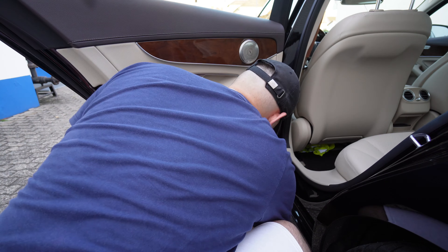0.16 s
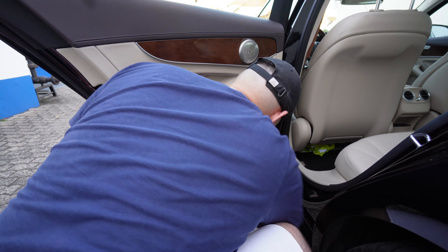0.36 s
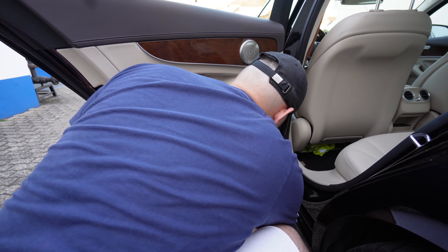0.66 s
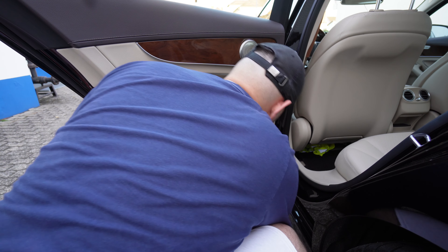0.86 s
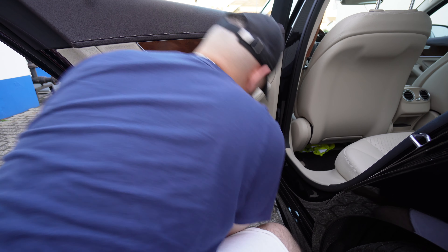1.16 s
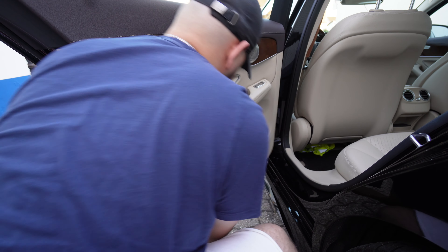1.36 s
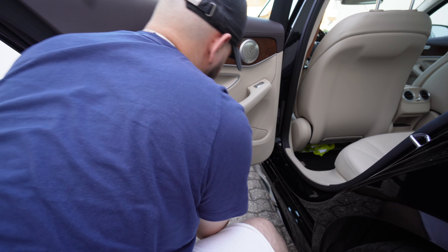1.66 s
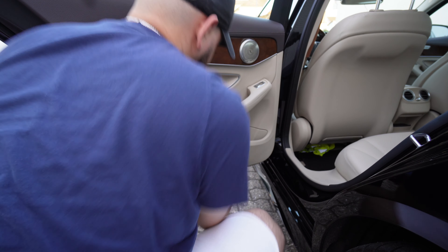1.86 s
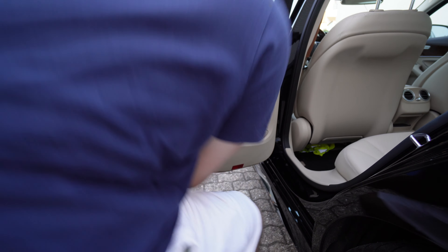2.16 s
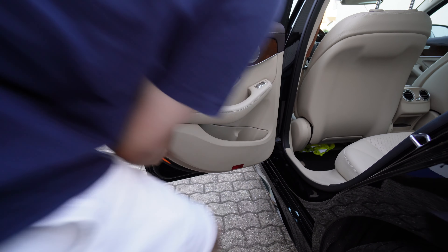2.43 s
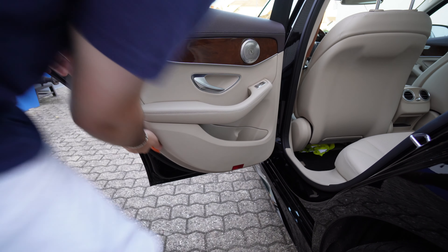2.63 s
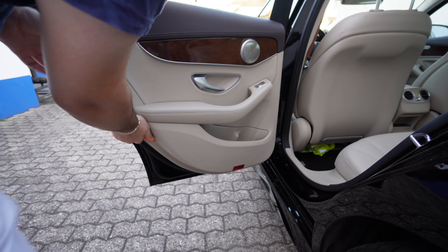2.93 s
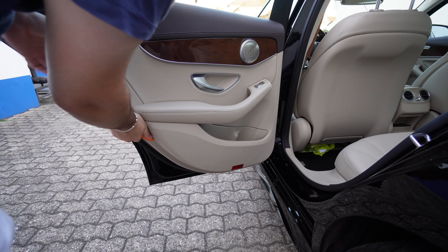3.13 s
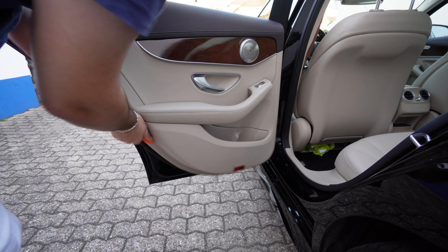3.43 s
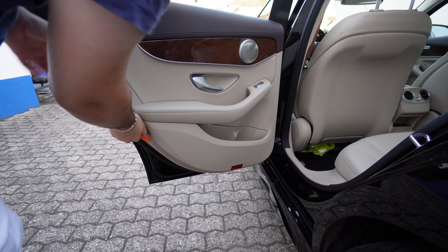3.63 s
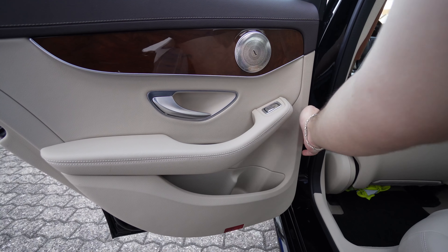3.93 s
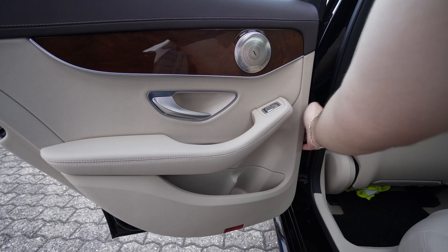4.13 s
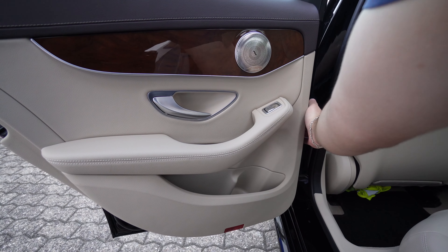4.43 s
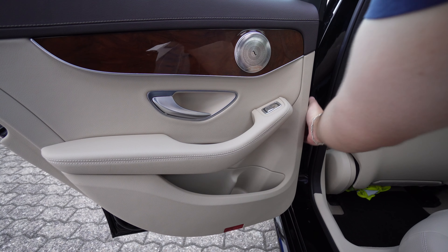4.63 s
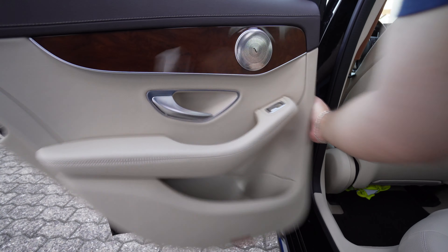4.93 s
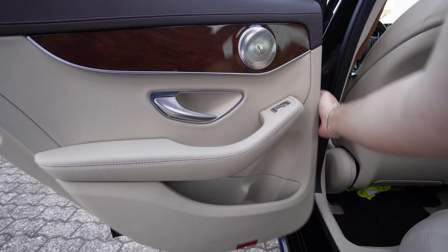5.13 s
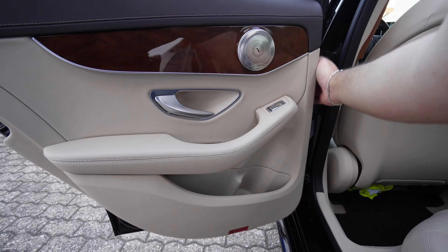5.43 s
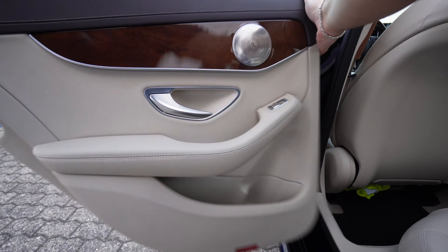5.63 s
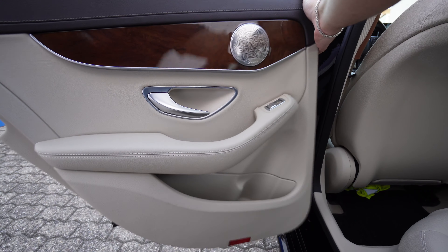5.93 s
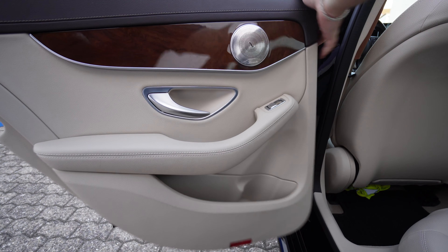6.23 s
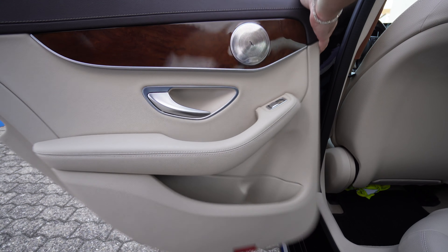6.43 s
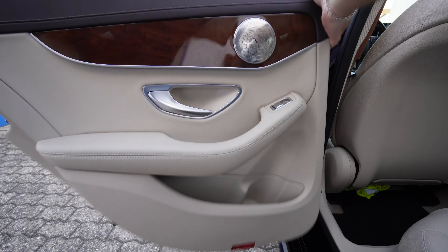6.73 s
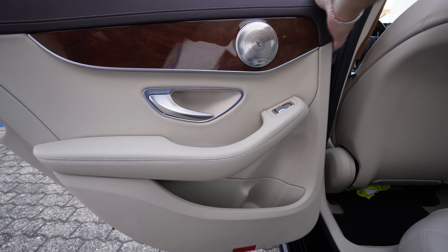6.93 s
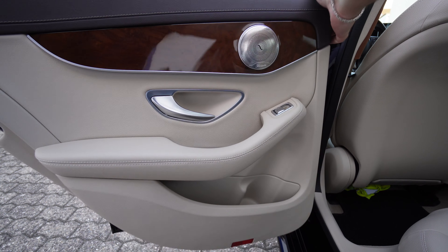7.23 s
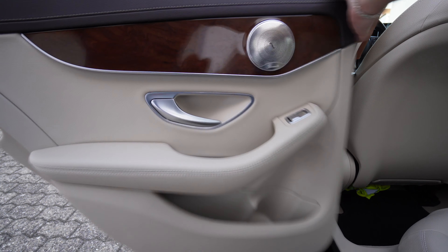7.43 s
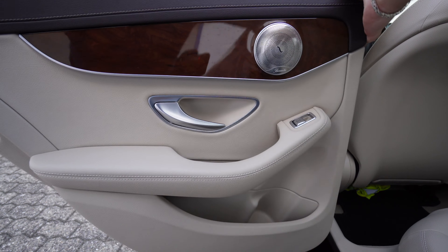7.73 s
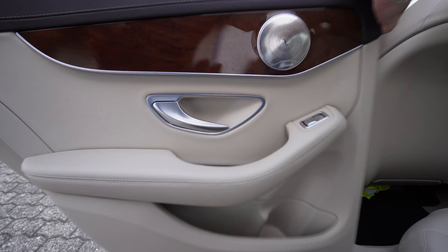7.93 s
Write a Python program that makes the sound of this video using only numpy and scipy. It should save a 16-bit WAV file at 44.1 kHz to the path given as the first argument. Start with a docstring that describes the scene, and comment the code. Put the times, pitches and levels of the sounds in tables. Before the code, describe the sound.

A hollow plastic trim panel is tugged from an open car door. Its retaining clips let go in dry, bright snaps, each backed by a boxy thud and a short buzzing rattle. Between pulls come light clacks, gritty scraping along the edge, dull rubbing and thin hand swishes. Quiet open air, very little echo, heard from close by.

```python
"""Plastic clips snap out of their holes as a trim panel is pulled off an open car door.
Outdoors, close microphones: the clips are bursts of damped noise, each with one ringing mode.
The hollow panel thuds in decaying sines; its loose parts rattle on after each pull, as grainy noise, and clack.
Between pulls the panel's edge scrapes and squeaks on the door and hands slide over the trim (filtered grains).
Faint ticks, the panel's own ringing, dull reflections and quiet air surround it."""
import sys
import numpy as np
from scipy import signal
from scipy.fft import rfft, irfft
from scipy.io import wavfile
from scipy.ndimage import uniform_filter1d

SR = 44100
rng = np.random.default_rng(int(sys.argv[2]) if len(sys.argv) > 2 else 0)


def materialize(psi):
    """Save the field psi as 16-bit PCM at rate SR to the path in sys.argv[1].

    A 1-D psi becomes a single channel; in a 2-D psi each row is a channel.
    """
    bounded = np.clip(np.atleast_2d(psi).T, -1, 1)
    quanta = np.round(bounded * 32767).astype(np.int16)
    wavfile.write(sys.argv[1], SR, quanta)


N = 356328


def amp(db):
    """Decibels to gain."""
    return 10 ** (np.asarray(db) / 20)


def unit(x):
    """Scales to rms 1."""
    return x / np.sqrt(np.mean(x ** 2) + 1e-20)


def read(points, hz):
    """Reads a spectrum on a log-frequency axis."""
    f, value = np.transpose(points)
    return np.interp(np.log(hz + 1), np.log(f), value)


def colour(x, points):
    """Filters by a spectrum that falls away beyond its ends."""
    hz = np.fft.rfftfreq(len(x), 1 / SR) + 1
    low_end = np.minimum(hz / points[0][0], 1) ** 2
    high_end = np.minimum(points[-1][0] / hz, 1) ** 2
    return irfft(rfft(x) * amp(read(points, hz)) * low_end * high_end, len(x))


def add(mix, s, sound):
    """Mixes a sound in at time s."""
    part = mix[round(s * SR):][:len(sound)]
    part += sound[:len(part)]


def grains(per_s, spread_db, t60, bed):
    """Random tiny impacts of uneven size, each a short burst, over a bed of smooth friction."""
    size = amp(spread_db * np.minimum(rng.exponential(1, N), 3)) * (rng.random(N) < per_s / SR)
    decay = np.exp(-2 * np.log(1000) / (t60 * SR))
    power = signal.lfilter([1], [1, -decay], size ** 2)
    power /= uniform_filter1d(power, size=2200) + 1e-6  # evens out the level over 50 ms
    return unit(np.sqrt(abs(power) + bed) * rng.standard_normal(N))


def shifting(x, patchy_db, size):
    """The point of contact moves, so the resonances it excites keep changing."""
    z = signal.stft(x, nperseg=512)[2]
    patches = uniform_filter1d(rng.standard_normal(z.shape), size=3, axis=0)  # across frequency
    patches = unit(uniform_filter1d(patches, size=size, axis=1))  # across time
    return signal.istft(z * amp(patchy_db * patches), nperseg=512)[1][:N]


def strokes(rows, rise, fall, arch_db):
    """Gain of (s, length, dB) strokes, strongest midway; rise and fall are shares of the length per 20 dB."""
    t, gain = np.arange(N) / SR, np.zeros(N)
    for s, length, db in rows:
        along = (t - s) / length
        outside = np.maximum(-along, 0) / rise + np.maximum(along - 1, 0) / fall
        arch = arch_db * (2 * np.clip(along, 0, 1) - 1) ** 2
        gain += amp(db - arch - 20 * np.minimum(outside, 10))
    return gain


# quiet outdoor air at the microphones: f/Hz, level/dB before scaling to AIR_DB
AIR_TONE = [(30, -12), (65, 2.5), (220, -1), (500, -13), (1500, -17.5), (4700, -23.5), (8000, -31),
            (16000, -41)]
# spread of the air between left and right: f/Hz, side over mid/dB
AIR_WIDTH = [(60, -11), (180, -20), (550, -8), (1650, -7.5), (4970, -5.5), (15000, 0)]
AIR_DB = -50.5  # rms of the mid


def air():
    """Quiet outdoor air as coloured noise, wider in the treble."""
    mid, side = (amp(AIR_DB) * unit(colour(noise, AIR_TONE)) for noise in rng.standard_normal((2, N)))
    side = colour(side, AIR_WIDTH)
    return np.array([mid + side, mid - side])


# tone of the ticks here, and of the loose parts in the rattle: f/Hz, relative level/dB
CHATTER_TONE = [(600, -3.5), (1100, -10), (2600, -6), (4300, -13.5), (6200, -15.5), (8000, -26.5),
                (15500, -37)]


def ticks(per_s=5, tick_db=-47, spread_db=5, t60_s=.07):
    """The strained plastic gives faint decaying ticks at random."""
    t = np.arange(SR // 10) / SR
    size = amp(tick_db - spread_db * rng.exponential(1, N)) * (rng.random(N) < per_s / SR)
    gain = signal.oaconvolve(size, amp(-60 * t / t60_s))[:N]
    return gain * unit(colour(rng.standard_normal(N), CHATTER_TONE))


# how much of a hit's weight each band takes: f/Hz, share (0 to 1)
WEIGHT_SHARE = [(1000, 1), (3500, 0)]
STRIKE_T60_S = .028  # a firm strike near 3 kHz


def struck_plastic(hits, tone, rise_s, tail_db, tail_t60, mode_db, mode_t60, firm_db, bass_slope=0.12):
    """A strike excites crowded, damped modes, one above the rest; high ones die first, the cavity rings on."""
    t, out = np.arange(SR // 4) / SR, np.zeros(N)
    octaves = 250 * 2. ** np.arange(7)
    bands = [[.62 * hz, min(1.2 * hz, SR / 2 - 1)] for hz in octaves]
    filters = [signal.butter(3, band, "band", fs=SR, output="sos") for band in bands]
    for s, db, ring_hz, weight_db in hits:
        spectrum = [(hz, db + band_db + weight_db * read(WEIGHT_SHARE, hz)) for hz, band_db in tone]
        drawn_out = 1 + np.clip((firm_db - db) / 10, 0, 1)  # light contacts skid and last longer
        for hz, sos in zip(octaves, filters):
            age = t / drawn_out * (hz / 3000) ** bass_slope  # treble rises and dies faster than bass
            strike = amp(-60 * age / STRIKE_T60_S)
            tail = amp(tail_db - 60 * age * drawn_out / tail_t60)
            shape = (1 - np.exp(-age / rise_s)) * (strike + tail)
            ring = signal.sosfilt(sos, shape * rng.standard_normal(len(t)))
            strongest = np.sqrt(uniform_filter1d(ring ** 2, size=220).max())  # rms over 5 ms
            add(out, s, ring / strongest * amp(read(spectrum, hz)))
        mode = np.sin(2 * np.pi * ring_hz * t) * (1 - np.exp(-t / rise_s)) * amp(-60 * t / mode_t60)
        add(out, s, 2 * mode * amp(mode_db + read(spectrum, ring_hz)))
    return out


# clips letting go and the panel cracking free:
# t/s, level/dB before the tone, ring of the struck part f/Hz, weight/dB added to the low end
SNAPS = [(0.0763, -48.5, 750, 17.5), (0.346, -23, 1750, 6), (0.372, -20.5, 1070, 8.5),
         (3.3159, -14, 750, -3.5), (3.3829, -11, 4180, -4), (3.669, -35, 1580, -2), (4.199, -40.5, 960, 10),
         (4.5252, -21, 1530, 5.5), (4.9275, -12.5, 1086, 2.5), (5.716, -38.5, 5570, -5),
         (6.1209, -40, 6400, -14), (6.451, -32, 1570, 6), (6.539, -9.5, 3970, -13), (6.556, -20, 2390, 1),
         (6.5886, -13, 2580, -1.5), (6.8705, -18, 3890, -12), (7.3648, -20, 1025, 4),
         (7.428, -13, 770, 3.5), (8.0102, -25.5, 3380, 3)]
# tone of a snap: f/Hz, relative level/dB
SNAP_TONE = [(330, -10), (1000, -6.5), (3500, -1.5), (8200, -11), (16000, -18)]


def clip_snaps():
    """Each clip's sudden release strikes the plastic around it."""
    return struck_plastic(SNAPS, SNAP_TONE, rise_s=0.0006, tail_db=-22, tail_t60=0.29,
                          mode_db=5, mode_t60=0.017, firm_db=-26.5)


# ringing modes of panel and door shell: f/Hz, relative level/dB, t60/s
PANEL_MODES = [(63.5, 5.5, 0.63), (101.2, -7.5, 0.5), (148.3, -6, 0.48), (201.7, -19.5, 1),
               (276, -32, 0.92), (289, 0, 0.29), (383.7, -6, 0.14), (577, -12, 0.12), (1028, 9, 0.097),
               (1214, -3, .19), (1415, 5, 0.072)]


def panel_ring(x, ring_db=-61):
    """The panel and door shell ring on, as decaying sines, after whatever shakes them."""
    t = np.arange(SR) / SR
    modes = sum(amp(db - 60 * t / t60) * np.sin(2 * np.pi * hz * t) for hz, db, t60 in PANEL_MODES)
    return amp(ring_db) * signal.fftconvolve(x, modes)[:N]


def yard(x, wet_db=-24, t60=0.2, dull_hz=4000):
    """Faint, dull reflections from the cabin and nearby walls, as a decaying noise tail."""
    t = np.arange(SR) / SR
    tail = rng.standard_normal(SR) * amp(-60 * t / t60) * (1 - np.exp(-t / 0.0033))
    tail = signal.sosfilt(signal.butter(2, dull_hz, fs=SR, output="sos"), tail)
    return amp(wet_db) * signal.fftconvolve(x, tail / np.linalg.norm(tail))[:N]


# low thuds of the hollow panel, and the higher hollow ring of struck plastic:
# t/s, level/dB (peak is 3 dB higher), pitch f/Hz
THUDS = [(0.345, -12, 305), (0.372, -12.5, 402), (0.402, -18, 269), (0.421, -15.5, 134), (.428, -20, 410),
         (0.509, -12.5, 335), (1.383, -36, 390), (1.566, -31.5, 232), (2.6935, -26.5, 2013),
         (3.317, -15, 807), (3.402, -8, 287.6), (3.917, -29.5, 248), (4.1996, -13, 268.2),
         (4.212, -19, 250), (4.264, -32, 312), (4.526, -17.5, 1280), (4.928, -8, 1050), (4.93, -22, 364),
         (4.971, -15.5, 131.6), (5.42, -23.5, 885), (5.985, -35.5, 189), (6.123, -28, 209),
         (6.548, -17, 338), (6.591, -11, 302), (6.604, -12.5, 149), (6.627, -9, 157), (6.63, -16.5, 478),
         (6.871, -19, 1454), (7.366, -11.5, 463), (7.37, -19.5, 180), (7.428, -13, 244), (7.44, -18.5, 133)]
THUD_T60_S, THUD_AT_HZ, THUD_SLOPE = .06, 305, 0.15  # t60 at that pitch; lower ones ring longer


def thuds(rise_cycles=1.33, upper=1.437, lower=0.728, flank_db=-8):
    """Each thud or hollow ring is a damped main mode and two weaker, randomly detuned ones."""
    t, out = np.arange(SR // 3) / SR, np.zeros(N)
    for s, db, hz in THUDS:
        turn = 2 * np.pi * hz * t
        t60 = THUD_T60_S * (THUD_AT_HZ / hz) ** THUD_SLOPE
        flanks = sum(np.sin(turn * ratio * rng.uniform(0.806, 1.11)) for ratio in (upper, lower))
        envelope = (1 - np.exp(-t * hz / rise_cycles)) * amp(-60 * t / t60)
        knock = (np.sin(turn) + amp(flank_db) * flanks) * envelope
        add(out, s, knock / abs(knock).max() * amp(db) * np.sqrt(2))
    return out


# each pull jolts the panel, which shakes for a moment and settles:
# t/s, shaking/s, level/dB before the rattle's trims, settling t60/s before any linger
JOLTS = [(0.347, 0.072, -25.5, 0.59), (3.319, .11, -25.5, 0.24), (3.514, 0.021, -38, 0.24),
         (4.928, 0.042, -24.5, 0.33), (6.54, 0.082, -26, 0.43), (7.428, .035, -25, 0.2)]
JOLT_RISE_S = 0.0017
AFTERSHAKE_DB, AFTERSHAKE_T60_S = -27, 1.14  # a faint tremor, relative to its jolt, outlasts it


def shaking(linger=1):
    """Gain over time of the jolts: a quick rise, a hold, then settling, which linger draws out."""
    t, gain = np.arange(SR) / SR, np.zeros(N)
    for s, hold, db, t60 in JOLTS:
        settling = np.maximum(t - hold, 0) / linger
        aftershake = amp(AFTERSHAKE_DB - 60 * settling / AFTERSHAKE_T60_S)
        release = np.maximum(amp(-60 * settling / t60), aftershake)
        add(gain, s, amp(db) * np.minimum(t / JOLT_RISE_S, 1) * release)
    return gain


# tone of the panel drumming under its loose parts: f/Hz, relative level/dB
DRUMMING_TONE = [(65, -6.5), (80, -4.5), (135, 4.5), (200, -2), (300, 1), (420, 1), (600, -12.5),
                 (1100, -11.5), (2000, -22)]


def rattle(chatter_db=2.5, drum_db=3, hard_db=-27, soft_hz=4200, drum_linger=1.84):
    """Loose clips and rods chatter against the shaking panel, which drums beneath them."""
    contacts = grains(per_s=520, spread_db=3, t60=.016, bed=.6)
    chatter = unit(colour(shifting(contacts, patchy_db=2.5, size=9), CHATTER_TONE))
    shake = shaking()
    hardness = np.minimum(shake / amp(hard_db), 1)  # weak contacts are duller
    soft = signal.sosfiltfilt(signal.butter(2, soft_hz, fs=SR, output="sos"), chatter)
    chatter = soft + np.sqrt(abs(hardness)) * (chatter - soft)
    beats = grains(per_s=370, spread_db=3.5, t60=0.028, bed=0.49)
    drumming = unit(colour(shifting(beats, patchy_db=1.0, size=9), DRUMMING_TONE))
    return chatter * shake * amp(chatter_db) + drumming * shaking(drum_linger) * amp(drum_db)


# loose plastic clacking against the door, duller than the snaps:
# t/s, level/dB before the tone, ring f/Hz, weight/dB added to the low end
CLACKS = [(0.5074, -23, 970, 5.5), (0.557, -22, 2770, -15), (0.631, -28.5, 3950, -13),
          (0.726, -38.5, 970, 10), (1.405, -40.5, 2750, 4), (1.4722, -35.5, 3550, -3.5),
          (1.568, -26.5, 2940, -5), (2.627, -41, 4000, -10), (2.6935, -35, 1950, -1),
          (2.799, -36.5, 2400, 3), (2.957, -46, 2350, 4), (3.307, -33, 4840, -12),
          (3.542, -24.5, 2700, -18), (4.92, -25.5, 3470, 4), (4.985, -18, 3000, 5),
          (5.3992, -25, 3090, 2.5), (5.4241, -26, 840, -1), (5.4563, -43, 1400, 1), (5.48, -50, 1250, 7),
          (5.529, -45.5, 1470, 11), (5.742, -50.5, 3930, 3), (6.179, -43.5, 3900, 2.5),
          (6.359, -38.5, 4070, -3.5), (7.474, -21, 2870, -11), (7.574, -37, 4700, -9),
          (7.6815, -38, 2480, -5)]
# tone of a clack: f/Hz, relative level/dB
CLACK_TONE = [(330, -12.5), (1000, -7.5), (3500, -1.5), (8200, -24), (16000, -56)]


def plastic_clacks():
    """Loose plastic strikes the door, with less treble than a snap and a louder tail."""
    return struck_plastic(CLACKS, CLACK_TONE, rise_s=0.0002, tail_db=-10, tail_t60=0.24,
                          mode_db=-1.5, mode_t60=.04, firm_db=-22)


# skin and cloth sliding: t/s, length/s, level/dB before the swish trim
SLIDES = [(.95, 3, -84), (2.42, 0.59, -67), (3.15, 0.095, -68), (3.81, 0.23, -59.5), (4.42, 0.28, -69),
          (5.13, .38, -56.5), (5.66, 0.054, -64.5), (5.97, 0.093, -67.5), (6.385, 0.057, -60.5),
          (6.99, 0.19, -58.5), (7.26, 0.098, -56.5)]
# tone of the sliding: f/Hz, relative level/dB
SWISH_TONE = [(2500, 4.5), (5000, -1.5), (7000, -1.5), (12000, -4.5), (16000, -12.5)]


def slide(swish_db=11.5):
    """Hands and shirt brush the trim with a thin, grainy hiss."""
    hiss = shifting(grains(per_s=1400, spread_db=6, t60=.008, bed=1.6), patchy_db=.8, size=20)
    gain = strokes(SLIDES, rise=0.52, fall=0.17, arch_db=3.5)
    return unit(colour(hiss, SWISH_TONE)) * gain * amp(swish_db)


# the panel's edge and fingers dragging:
# t/s, length/s, gritty scrape level/dB, dull rub level/dB before its trim
SCRAPES = [(2.305, 0.12, -36, -50), (2.798, 0.073, -33.5, -46), (3.154, 0.061, -49, -43.5),
           (3.737, 0.84, -60, -46.5), (4.081, 0.016, -51, -46), (4.377, 0.4, -43.5, -35),
           (4.858, 0.055, -48.5, -41.5), (5.063, 0.35, -76, -40), (5.395, 0.11, -37.5, -34),
           (6.736, 0.12, -32, -31), (6.984, 1, -54, -51), (7.123, .02, -43, -43), (7.883, 0.16, -47, -48)]
# tone of the gritty scrape: f/Hz, relative level/dB
GRIT_TONE = [(700, -21), (1400, 1.5), (3300, -3), (5500, -9.5), (8000, -18.5), (16000, -32.5)]
# tone of the dull rub: f/Hz, relative level/dB
RUB_TONE = [(100, -1), (200, 1), (380, 1), (680, -5.5), (1100, -5.5), (1900, -8), (3000, -29.5)]


def scrape(rub_db=-1):
    """Stick and slip along the panel's edge: fine grit over a hollow rub."""
    slips = grains(per_s=900, spread_db=3.5, t60=.005, bed=.7)
    grit = unit(colour(shifting(slips, patchy_db=1.5, size=9), GRIT_TONE))
    drags = grains(per_s=310, spread_db=4.5, t60=0.014, bed=0.59)
    rub = unit(colour(shifting(drags, patchy_db=-0.5, size=7), RUB_TONE))
    s, length, gritty, dull = np.transpose(SCRAPES)
    shape = dict(rise=0.083, fall=0.29, arch_db=5)
    grit_gain = strokes(zip(s, length, gritty), **shape)
    rub_gain = strokes(zip(s, length, dull + rub_db), **shape)
    return grit * grit_gain + rub * rub_gain


# plastic squeaking as it slips: t/s, length/s, pitch f/Hz, level/dB
SQUEAKS = [(4.033, 0.0092, 10700, -44.5), (6.668, 0.015, 6450, -41.5)]


def squeaks(width_hz=500):
    """A slipping clip sings briefly in one narrow, unsteady band."""
    out, t = np.zeros(N), np.arange(N) / SR
    r = np.exp(-np.pi * width_hz / SR)
    noise = rng.standard_normal(N) + 1j * rng.standard_normal(N)
    waver = signal.lfilter([1], [1, -2 * r, r * r], noise)
    for s, length, hz, db in SQUEAKS:
        tone = unit((waver * np.exp(2j * np.pi * hz * t)).real)  # shifts the waver up to the pitch
        out += tone * strokes([(s, length, db)], rise=.3, fall=.6, arch_db=3)
    return out


LEAN_LEFT, LEAN_HZ = 0.052, 900  # gain and corner: the treble comes a little from the left


def stereo(x, width):
    """Close microphones share the bass; scatter off the door makes the treble differ."""
    z = signal.stft(colour(x, width), nperseg=128)[2]
    random_phase = np.exp(2j * np.pi * rng.random(z.shape))
    scatter = signal.istft(z * random_phase, nperseg=128)[1][:N]
    side = np.sqrt(2) * signal.sosfilt(signal.butter(2, 250, "high", fs=SR, output="sos"), scatter)
    side += LEAN_LEFT * signal.sosfiltfilt(signal.butter(1, LEAN_HZ, "high", fs=SR, output="sos"), x)
    return np.array([x + side, x - side])


# spread of the door's sounds at the microphones: f/Hz, side over mid/dB before scattering
DOOR_WIDTH = [(120, -63), (500, -25), (1000, -12.5), (2000, -16.5), (4000, -9.5), (8000, -6), (14000, -3)]
# spread of the sliding hands: f/Hz, side over mid/dB before scattering
SWISH_WIDTH = [(2000, -24.5), (5000, -10), (12000, -4)]


def scene(lowest_hz=52):
    """The door's sounds ring the panel and reflect; sliding hands and outdoor air are added directly."""
    clips = clip_snaps()
    clacks = plastic_clacks()
    door = clips + clacks + thuds() + rattle() + scrape() + squeaks() + ticks()
    door = door + panel_ring(door)
    # an open door radiates no deep bass
    door = signal.sosfilt(signal.butter(2, lowest_hz, "high", fs=SR, output="sos"), door)
    return stereo(door + yard(door), DOOR_WIDTH) + stereo(slide(), SWISH_WIDTH) + air()


def record(dry, edge_hz=16000, ceiling=.82):
    """The loudest peaks are rounded off below the ceiling; then a lowpass sets the band limit."""
    limited = dry / (1 + (dry / ceiling) ** 6) ** (1 / 6)
    lowpass = signal.firwin(255, edge_hz, window=("kaiser", 9), fs=SR)
    return signal.oaconvolve(limited, lowpass[None], "same")


dry = scene()
out = record(dry)
materialize(out)
```